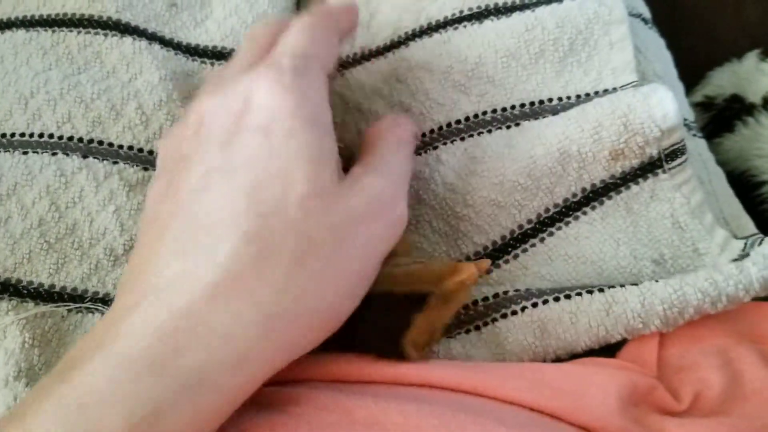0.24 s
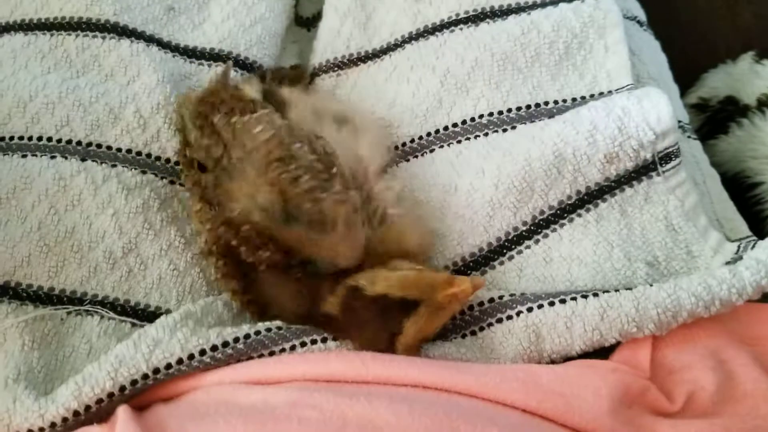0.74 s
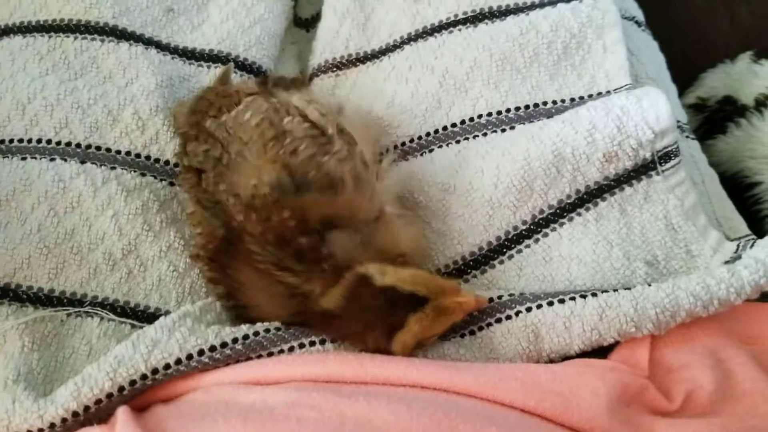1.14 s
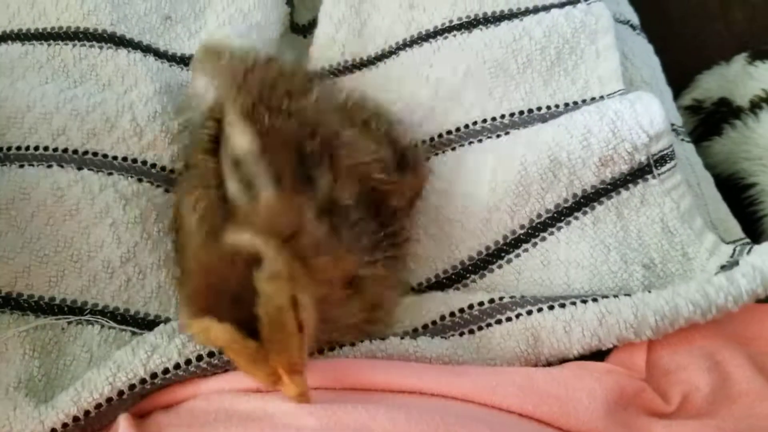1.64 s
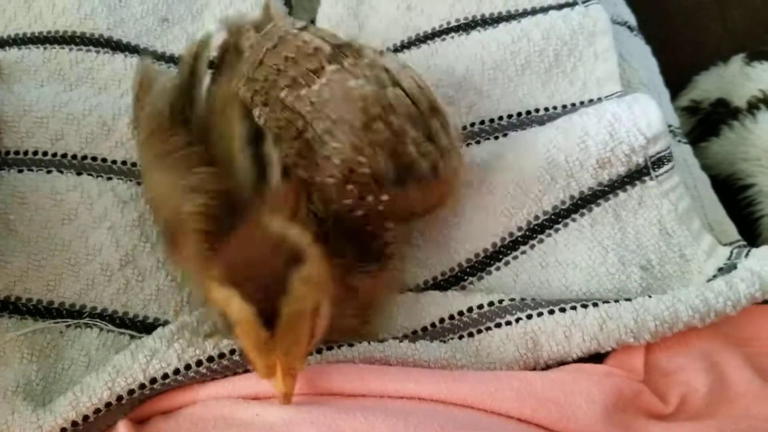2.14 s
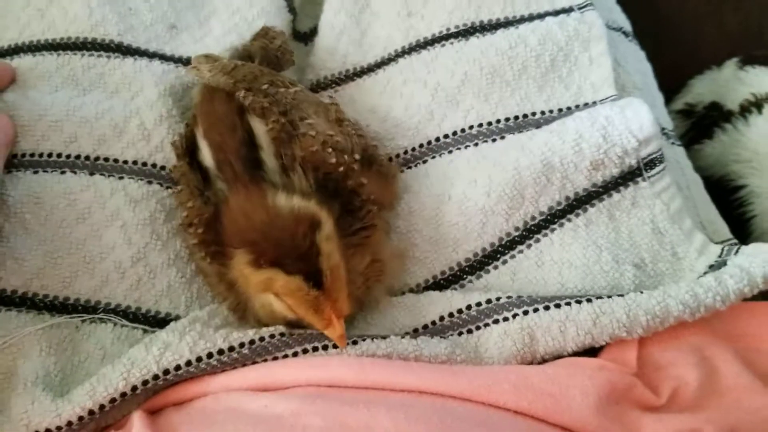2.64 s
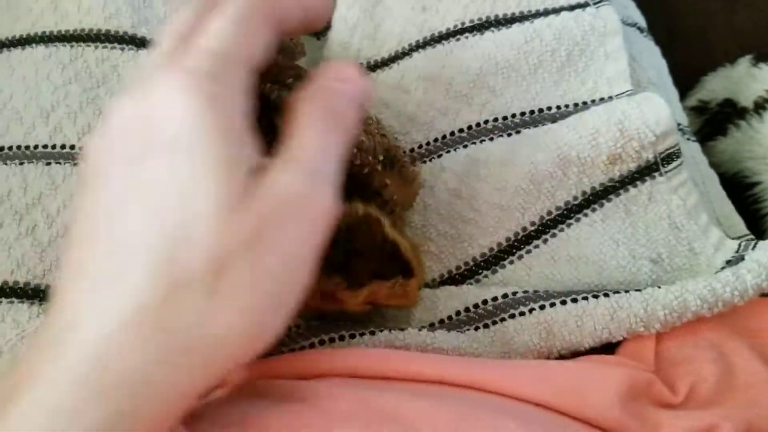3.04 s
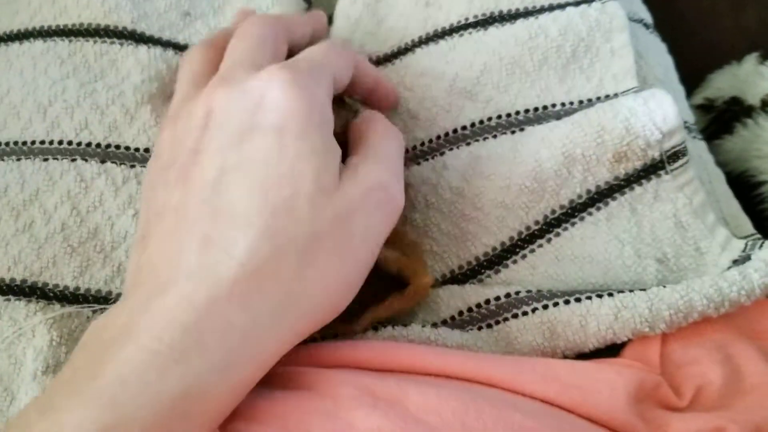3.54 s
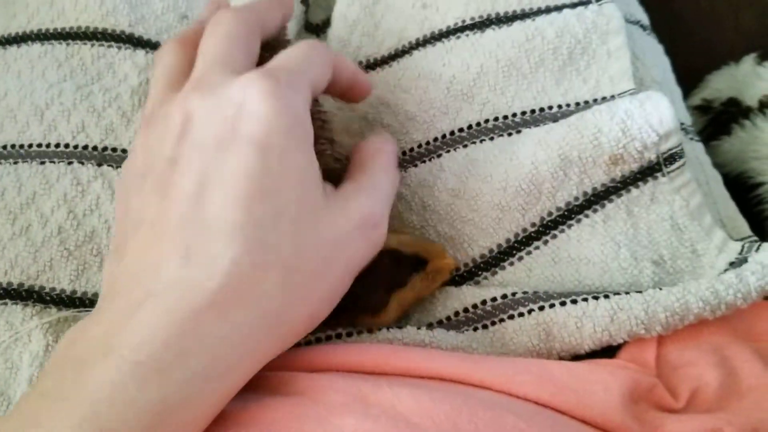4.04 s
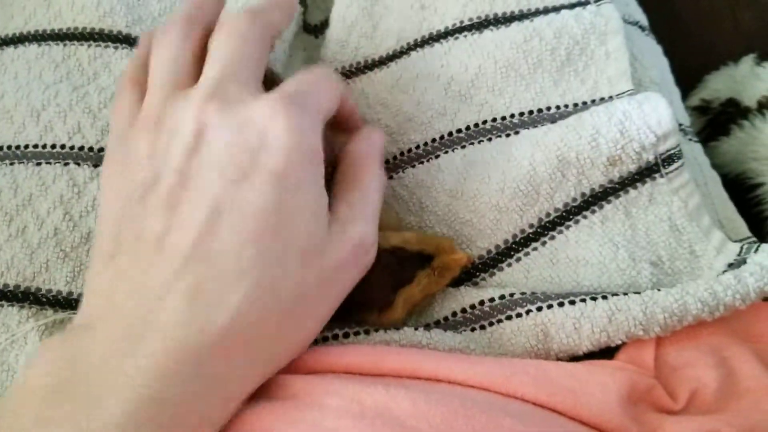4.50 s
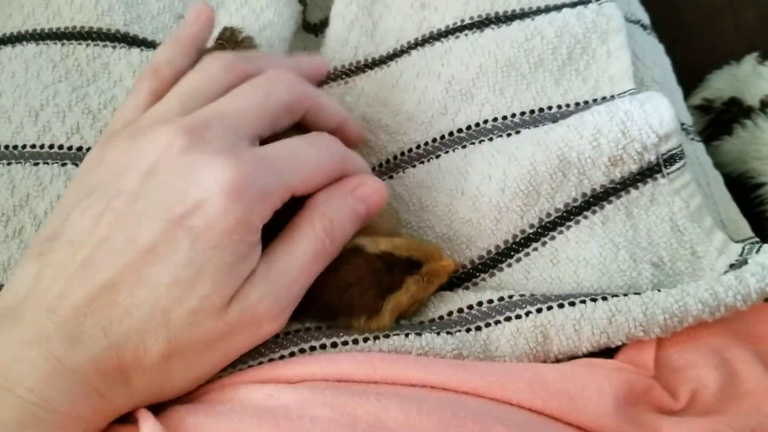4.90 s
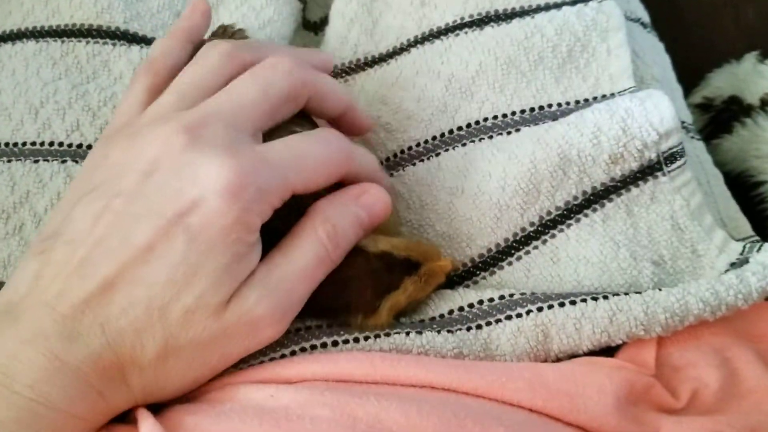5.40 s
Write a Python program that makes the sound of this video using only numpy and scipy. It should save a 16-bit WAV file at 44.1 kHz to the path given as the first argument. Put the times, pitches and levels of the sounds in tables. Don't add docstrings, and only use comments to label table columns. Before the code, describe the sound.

A close, dry stereo pickup in a small furnished room, with a steady low motor hum near 90 Hz, soft rumble and faint hiss throughout. A young chick, toward the right, peeps at once, then twice at 0.4 and 0.6 s: short pure whistles around 2.5 to 3 kHz, over soft palm rustle. A tiny low double thump at 0.53 s marks the hand knocking the holder. From 0.54 to 2.2 s feet scrabble on towel: dull scuffs, sharp thread snaps, and clusters of soft pops, densest at 1.4 to 2.0 s, with feathery rustle. A lull follows. Fingers land at 2.8 s and stroke with fine hiss until the end at about 5.5 s. Louder, slightly lower peeps, some with a cracking waver, come at 2.9, 3.6, 3.8, 4.4, 4.7 and 5.4 s, many sagging then flicking up. Faint distant chicks peep higher, irregularly, blurred by the room.

```python
import sys
import numpy as np
from scipy import signal
from scipy.fft import rfft, irfft, next_fast_len
from scipy.io import wavfile
from scipy.ndimage import uniform_filter1d, map_coordinates

SR = 44100
rng = np.random.default_rng(int(sys.argv[2]) if len(sys.argv) > 2 else 0)


def materialize(psi):
    bounded = np.clip(np.atleast_2d(psi).T, -1, 1)
    quanta = np.round(bounded * 32767).astype(np.int16)
    wavfile.write(sys.argv[1], SR, quanta)


def voltage_ratio(level):
    return 10 ** (np.asarray(level, float) / 20)


N = 249606
TIME = np.arange(N) / SR


def chick():
    # start in seconds, length in seconds, peak level in dB.
    peeps = [
        (.003, 0.052, -38),
        (.409, 0.077, -37),
        (0.576, 0.034, -38),
        (2.881, 0.06, -33.5),
        (3.606, 0.064, -33),
        (3.784, 0.052, -31),
        (4.441, 0.073, -31),
        (4.665, 0.03, -34.5),
        (5.376, 0.068, -33),
    ]
    # start to peak in seconds, slow swell in dB, last push in dB, fade after peak in dB.
    breaths = [(0.03, 7.5, -1.5, 5.5), (0.066, 2, -0.5, 8.5), (0.021, 5, 4, 6), (0.047, 15, 3.5, 1.5),
               (0.048, 9.5, 6.5, 14.5), (0.037, 7, 1.5, 11), (0.051, 5, 3.5, 12.5), (0.014, -2, -2, 6),
               (0.047, 8.5, 5, 12.5)]
    # first note in Hz, note at the turn in Hz, start to flick in seconds, last note in Hz.
    tunes = [(2885, 2545, 0.041, 2560), (2830, 2678, .049, 3070), (2950, 2975, 0.017, 2740),
             (2400, 2345, .029, 2777), (2350, 2327, 0.0353, 2590), (2450, 2304, 0.026, 2508),
             (2370, 2310, 0.036, 2930), (2360, 2417, 0.013, 2345), (2290, 2179, 0.0292, 2790)]
    # left minus right in dB, upper overtones in dB, octave in dB (the hand swallows them).
    postures = [(-16, -12, -22), (-14.5, -5, -18.5), (-14, -10, -38), (-12.5, -8, -25), (-13, -13, -26),
                (-12.5, -13, -27.5), (-13, -17, -21.5), (-12, -15, -22.5), (-11, -13, -23.5)]
    # attack in seconds, last note to end in seconds, slip down at end as share of flick, room in dB.
    manners = [(0.008, 0.0098, 0.43, 2.5), (0.01, 0.0085, 0.43, -0.5), (0.0067, 0.003, 0.1, -7),
               (0.014, 0.0083, 0.44, -5.5), (.011, 0.0112, 0.55, -3), (0.012, 0.011, .4, -3),
               (.011, 0.0109, .5, -4), (0.011, 0.0054, 0.33, -5), (.013, 0.013, 0.78, -1.5)]
    scoops_hz = [61, 79.5, 62.5, 82, 79.5, -1, 221, 80.5, 119.5]
    # multiple of the pitch, level against the octave in dB.
    overtones = [(3, -3), (4, -4), (5, -7)]
    # time in seconds, level in dB, length in seconds.
    hiccups = [
        (2.923, -60.5, 0.0034),
    ]
    # time in seconds, dip in dB, fade in seconds, rebound in dB.
    catches = [
        (2.893, 12, 0.0018, -4),
        (2.906, 20, 0.0028, 0),
        (3.6225, 12, 0.0037, 6),
        (3.639, 15, 0.0036, 4),
        (5.3905, 9.5, 0.0023, 4.5),
        (5.4135, 17, 0.0039, 8),
    ]

    tables = []
    for peep, breath, tune, pose, way, scoop in zip(peeps, breaths, tunes, postures, manners, scoops_hz):
        tables.append(near_peep(*peep, *breath, *tune, pose[2], *way[:3], scoop))
    (hz, db, octave_db), gate = voice(tables, edge_s=.002)
    pan_db, upper_db, _ = per_peep(peeps, postures)
    room_db = per_peep(peeps, manners)[-1]
    phase = 2 * np.pi * np.cumsum(hz) / SR
    tone = voltage_ratio(db) * np.sin(phase) + voltage_ratio(octave_db) * np.sin(2 * phase)
    for k, rel_db in overtones:
        tone += voltage_ratio(octave_db + upper_db + rel_db) * np.sin(k * phase)
    for s, half_db, length in hiccups:
        half_pitch = np.sin(phase / 2) + np.sin(3 * phase / 2)
        tone += voltage_ratio(half_db) * np.exp(-((TIME - s) / length) ** 2) * half_pitch
    tone *= np.sqrt(2) * gate * breaks(catches)
    shimmer = map_coordinates(rng.standard_normal(2000), [TIME * 300])
    tone *= voltage_ratio(.55 * shimmer)
    near = panned(pan_db) * voltage_ratio(1.93) * np.array([np.roll(tone, -2), tone])
    escape = voltage_ratio(6 * (hz - 2500) / 400 + room_db)
    return near + voltage_ratio(-22.0) * voltage_ratio([[-1.5], [1.5]]) * room(escape * tone, delay_s=0.011)


def near_peep(s, length, db, peak, swell_db, push_db, fade_db, first_hz, low_hz, turn, last_hz, octave_db,
              attack, perch, slip, scoop_hz):
    onset_db, end_db, release_s, push_s = -36, -28, .0058, .01
    sag_curve, swell_curve, flick_late = 1.9, 1.3, 1.15
    closed_db, octave_grows = -3.5, .79
    thin_hz, thin_db_per_hz = 2760, .022
    t, end = np.linspace(0, length, num=40), length - release_s
    ramp = lambda a, b: np.clip((t - a) / (b - a), 0, 1)

    flick = np.sin(np.pi / 2 * ramp(turn, length - perch) ** flick_late) ** 2
    flick = flick - slip * ramp(length - perch, length) ** 2 * np.sign(last_hz - low_hz)
    sag = (1 - ramp(0.0057, turn + 0.00092)) ** sag_curve
    hz = low_hz + (first_hz - low_hz) * sag + (last_hz - low_hz) * flick

    under_db = onset_db * (1 - ramp(0, attack)) ** 2
    under_db -= swell_db * (1 - ramp(0, peak)) ** swell_curve
    under_db -= push_db * (1 - ramp(peak - push_s, peak))
    under_db += end_db * ramp(end, length) ** 2
    under_db -= fade_db * ramp(peak, max(end, peak + .001))
    beak_db = closed_db * (1 - ramp(turn - .012, peak)) - thin_db_per_hz * np.maximum(hz - thin_hz, 0)
    octave_swing_db = octave_grows * np.maximum(under_db, -15)
    return np.transpose([s + t, hz + scoop_hz * (1 - ramp(0, attack)), db + under_db,
                         db + octave_db + beak_db + under_db + octave_swing_db])


def scratching():
    out = toe_drag() + thread_snags() + toe_pops()
    return out + voltage_ratio(-13) * room(out.mean(axis=0), delay_s=.003)


def toe_drag():
    # start in seconds, scuff level in dB, length in seconds, brightness in dB.
    kicks = [(0.539, -59.5, 0.05, -0.5), (.592, -54, 0.011, 1.5), (0.73, -61.5, 0.023, -5),
             (0.765, -53, 0.0039, 1), (0.861, -58.5, 0.053, -5), (1.058, -56, 0.016, -19),
             (1.235, -50, 0.035, -9), (1.28, -65, 0.026, 3), (1.374, -51.5, 0.03, -4.5),
             (1.411, -61.5, 0.042, 1.5), (1.452, -58, 0.013, -5), (1.525, -46.5, 0.03, -6),
             (1.601, -56, 0.019, -9), (1.661, -55.5, 0.019, -1.5), (1.677, -49, 0.033, -11.5),
             (1.82, -48, 0.033, -9), (1.865, -60.5, 0.033, 1), (1.975, -48.5, 0.038, -7),
             (2.014, -59, 0.013, -10), (2.1, -67, 0.022, -2), (2.141, -53, 0.039, -4)]
    # frequency in Hz, level in dB per Hz.
    scuff = [(240, -54), (400, 0), (1300, 1.5), (1700, -18.5), (2240, -0.5), (3990, -27), (4730, -26),
             (6000, -19), (7800, -45), (13200, -120)]
    fringe = [(3500, 11.6), (8000, 4.0), (12500, 4.0), (16000, 2.27)]  # Hz, dB per Hz
    dull = sum(voltage_ratio(db) * stroke(s, w) for s, db, w, _ in kicks)
    bright = sum(voltage_ratio(db + b_db) * stroke(s, 1.19 * w) for s, db, w, b_db in kicks)
    out = voltage_ratio(-5) * dull * pair(.95, grain_db=2.5)(colour(scuff)) * voltage_ratio([[-1.3], [1.3]])
    return out + bright * pair(.45, grain_db=4.5)(colour(fringe)) * voltage_ratio([[-2.5], [2.5]])


def stroke(s, length):
    land_s = .005
    return np.clip((TIME - s) / land_s, 0, 1) * np.exp(-((TIME - s) / length) ** 4)


def thread_snags():
    # time in seconds, peak in dB, low part in dB, extra middle in dB.
    snags = [(.5484, -54, -4, -6), (0.5614, -46.5, 8.5, 6), (0.567, -46, -9, 8), (0.5758, -46, 2, 12),
             (.5894, -53, 4, 6), (.594, -47.5, 8.5, -2), (0.602, -48, 6, 9), (.7064, -48, -14, -4),
             (.7316, -36.5, -14, 2.5), (0.7406, -48.5, 5, 4), (0.7483, -51.5, 10, -4),
             (0.871, -43.5, -9, -5), (0.8864, -38.5, -2.5, 3.5), (0.9027, -40, -1, 3), (.907, -48, -2, 0),
             (1.0165, -58, 8, -3), (1.0367, -43.5, -2, 2), (1.057, -52, 1, 0), (1.0848, -51, 3, 0),
             (1.1945, -51, 0, -4), (1.229, -49, -13, -6), (1.2392, -44.5, 6, -3), (1.2432, -50, 0, -3),
             (1.2948, -53, 13, -6), (1.422, -48, -8, 2), (1.4266, -44, 4, 3), (1.5225, -47, 0, 5),
             (1.5333, -55, -5, 4), (1.543, -47, 10, -2), (1.554, -50, 13, 0), (1.5667, -58, -1, 0),
             (1.6634, -49, -8, 0), (1.697, -50, -5, 4), (1.78, -52, -6, -2), (1.8144, -50, 0, 11),
             (1.8804, -51, -1, 4), (1.9895, -50, -1, -3), (1.999, -48, -3, 5), (2.0213, -50, -6, -9),
             (2.1504, -54, 0, 2), (2.1558, -50, -8, 5), (2.1636, -47, -5, 9), (2.2193, -47, -8, -4),
             (2.2244, -45, -15, -8), (2.821, -62, -13, 0), (3.4175, -64, 12, -2)]
    # ring in Hz, decay time in seconds.
    thread = [(12200, 0.00047), (4850, 0.00039), (2050, 0.00029)]
    usual_db, rise_s = -51.5, .000079
    crack_db, crack_hz, crack_s = -3.5, 6600, .00029
    out, t = np.zeros((2, N)), np.arange(300) / SR
    crack = np.cos(2 * np.pi * crack_hz * t) * np.exp(-t / crack_s)
    phases = rng.uniform(0, 2 * np.pi, (len(snags), 3, 2, 1))
    for (s, db, low_db, extra_db), turns in zip(snags, phases):
        mid_db = -3 - .4 * (db - usual_db)
        pan_db = min(0, -19 - .39 * (db - usual_db))
        sizes_db = (db - 1, db + mid_db + extra_db, db + low_db + 3)
        snap = voltage_ratio(db + crack_db) * crack
        for (hz, life), size_db, turn in zip(thread, sizes_db, turns):
            ring = np.sin(2 * np.pi * hz * t + turn * [[.5], [.2]])
            snap = snap + voltage_ratio(size_db) * ring * np.exp(-t / life)
        snap = panned(pan_db)[:, None] * snap * 1.4 * (1 - np.exp(-t / rise_s))
        out[:, round(s * SR):][:, :300] += snap
    return out


def toe_pops():
    # time in seconds, peak in dB, pitch in Hz.
    taps = [(0.885, -49, 1610), (0.903, -48, 1760), (1.0372, -51, 1790), (1.0571, -46.5, 1720),
            (1.2399, -47, 1780), (1.2432, -46, 1400), (1.2495, -43, 1530), (1.2548, -44.0, 1515),
            (1.258, -48.0, 1420), (1.2955, -48.0, 2000), (1.3844, -54, 1370), (1.391, -42.5, 1240),
            (1.3945, -38, 1680), (1.3988, -47.0, 1790), (1.4052, -50.0, 1400), (1.4274, -53, 1580),
            (1.453, -42, 1140), (1.5333, -42, 1630), (1.5378, -35, 1740), (1.5413, -42, 1530),
            (1.546, -47, 1470), (1.549, -49.5, 1200), (1.5538, -40.0, 1390), (1.5584, -49, 1570),
            (1.6063, -45, 1290), (1.6142, -46, 1280), (1.6525, -49, 1440), (1.6677, -43, 1410),
            (1.6725, -46, 1350), (1.6773, -49, 1690), (1.6876, -43.5, 1880), (1.6915, -46, 1320),
            (1.6938, -45.5, 1270), (1.6992, -41, 1510), (1.702, -44, 1180), (1.814, -45, 1390),
            (1.8272, -40, 1290), (1.8333, -45, 1334), (1.8374, -37.5, 1420), (1.8412, -51.0, 1540),
            (1.846, -46.5, 1580), (1.8669, -50.5, 1890), (1.8753, -43, 1360), (1.978, -40, 1280),
            (1.9818, -42, 1450), (1.986, -50, 1270), (1.988, -43.5, 1180), (1.991, -41, 1540),
            (1.9941, -42.5, 1380), (1.9989, -36.5, 1340), (2.0013, -43, 1290), (2.007, -44, 1270),
            (2.026, -48, 1710), (2.1556, -43.0, 1450), (2.1607, -51, 1690), (2.1665, -41, 1410)]
    # time in seconds, peak in dB, pitch in Hz.
    soft_taps = [
        (.8555, -60, 1800),
        (0.9298, -54, 1200),
        (1.353, -52, 1100),
        (1.7965, -51, 1140),
        (1.9615, -50, 1030),
        (2.1025, -51, 1200),
        (2.2955, -62, 1210),
        (3.4175, -52.5, 1000),
    ]
    half_s, level_db = .00056, -2
    rows = list(taps) + list(soft_taps)
    out, t = np.zeros((2, N)), np.arange(300) / SR
    t = t - t.mean()
    for (s, db, hz), turn in zip(rows, rng.uniform(0, 2 * np.pi, len(rows))):
        pop = np.sin(2 * np.pi * hz * t + turn) * np.exp(-(t / half_s) ** 2)
        out[:, round(s * SR) - 150:][:, :300] += voltage_ratio(db + level_db) * voltage_ratio([[-1.1], [1.1]]) * pop
    return out


def rubbing():
    # time in seconds, level in dB.
    struggle = [(0, -75.5), (.34, -90.5), (.6, -75.5), (.85, -87.5), (1.2, -77.5), (1.5, -71), (1.9, -71),
                (2.15, -74.5), (2.3, -85), (2.55, -101)]
    wriggle = voltage_ratio(np.interp(TIME, *np.transpose(struggle)))
    return down(wriggle) + fingertips() + cupped_hand() + palm(wriggle)


def down(wriggle):
    # time in seconds, level in dB, sizzle in dB.
    shakes = [(.49, -75, -16), (0.739, -74, 2), (.895, -89, 7), (1.07, -67.5, 5), (1.23, -72, -8),
              (1.39, -91, 4), (1.68, -76.5, -1), (1.791, -70, -10), (2.019, -89, 1), (2.169, -77, -19),
              (2.227, -67.5, -2)]
    # frequency in Hz, level in dB per Hz.
    rustle_hz_db = [(3000, -9), (4600, -10.5), (6250, -6.5), (8000, -5.5), (8500, -5), (9600, -2.5),
                    (11500, -7.5), (16000, -38)]
    # frequency in Hz, level in dB per Hz.
    sizzle_hz_db = [(5000, -32), (9000, -23), (11000, -9), (12500, 3), (14000, -1.5), (16000, -1)]
    shake_s = .015
    rustle = wriggle + swells([(s, db, shake_s) for s, db, _ in shakes])
    sizzle = voltage_ratio(5) * wriggle + swells([(s, db + rel_db, shake_s) for s, db, rel_db in shakes])
    out = rustle * voltage_ratio(8.0) * pair(.4, grain_db=3.2)(colour(rustle_hz_db)) * voltage_ratio([[-2.5], [2.5]])
    return out + sizzle * voltage_ratio(3.5) * pair(.1, grain_db=2.5)(colour(sizzle_hz_db)) * voltage_ratio([[.3], [-.3]])


def fingertips():
    # middle in seconds, level in dB, half length in seconds.
    strokes = [(2.83, -71, 0.023), (2.9, -80, 0.052), (3.2, -87, 0.085), (3.39, -77, 0.086),
               (3.62, -78.5, 0.088), (3.8, -77, .04), (3.9, -72.5, 0.048), (4, -76.5, .02),
               (4.068, -67.5, 0.037), (4.16, -78, 0.027), (4.23, -70.5, 0.05), (4.38, -72, 0.063),
               (4.6, -68, 0.026), (4.76, -76.5, 0.042), (4.94, -78.5, 0.087), (5.11, -80, 0.052),
               (5.25, -83, 0.041), (5.4, -82, .05), (5.53, -84, 0.044)]
    # frequency in Hz, level in dB per Hz.
    swish = [(3000, -10), (4700, -9), (6250, -6), (7900, -11), (8800, -1.5), (9800, -2.5), (10800, -8.5),
             (11400, -8.5), (13000, -11.5), (16000, -10)]
    land_s, rest_db = 2.815, -86
    level = voltage_ratio(rest_db) * (TIME > land_s) + swells(strokes, power=2.5)
    return level * voltage_ratio(5.0) * pair(.4, grain_db=1.3)(colour(swish)) * voltage_ratio([[-2.4], [2.4]])


def cupped_hand():
    # middle in seconds, level in dB, half length in seconds.
    presses = [
        (.09, -71, .05),
        (4.78, -78, 0.074),
        (4.96, -75.5, 0.15),
    ]
    # frequency in Hz, level in dB per Hz.
    cup = [(3900, -13), (4300, -2), (4550, -2), (4800, -4), (5300, -15)]
    return swells(presses) * pair(.3, grain_db=1.2)(colour(cup))


def palm(wriggle):
    # middle in seconds, level in dB, half length in seconds.
    slides = [
        (.26, -77, 0.15),
        (3.03, -76, 0.14),
        (4.59, -73.5, 0.14),
    ]
    # frequency in Hz, level in dB per Hz.
    palm_hz_db = [(800, -16), (1500, -9), (2500, -2.5), (3500, -5), (5000, -6.5), (6500, -14.5),
                  (9000, -19.5)]
    rest_db, drag_db = -93, -8
    level = voltage_ratio(rest_db) + voltage_ratio(drag_db) * wriggle + swells(slides, power=4)
    return level * voltage_ratio(11.5) * pair(.2, grain_db=1.2)(colour(palm_hz_db))


def knock():
    # time in seconds, peak in dB, pitch in Hz.
    bumps = [
        (0.522, -40, 90),
        (.5285, -41, 110),
        (.534, -36.5, 141),
        (.5385, -36.5, 108),
    ]
    out = np.zeros(N)
    for k, (s, db, hz) in enumerate(bumps):
        t = TIME - s
        out += voltage_ratio(db) * (-1) ** k * np.exp(-(t / 0.0007) ** 2) * np.cos(2 * np.pi * hz * t)
    return out


def other_chicks():
    # start in seconds, length in seconds, middle dB, middle pitch in Hz, end minus start in dB.
    peeps = [(0.517, 0.039, -58, 3120, 0), (1.068, 0.02, -66, 4260, 0), (1.442, 0.043, -56, 3063, 9),
             (1.721, .07, -59.5, 3253, -11), (2.529, 0.045, -61.5, 3140, -6), (2.74, 0.047, -65.5, 3310, 6),
             (3.292, 0.036, -56.5, 3128, 0), (3.504, 0.042, -59.5, 3465, -12),
             (3.775, 0.03, -67.5, 3405, 7), (4.281, 0.045, -57.5, 3254, 3.5),
             (4.528, 0.083, -63.5, 3390, -11), (5.178, 0.015, -74, 3010, -2)]
    # room share in dB, push in dB.
    manners = [(-1, -1), (-1, 0), (-14, 4), (-4, -3), (-5.5, -2), (1, 0), (-7, 7), (-0.5, 8), (-15, -3),
               (-4.5, 5), (-1, -3), (-5, -5)]
    scoops = [.97, 1.01, .98, .89, .86, .93, .98, .85, 1.01, .94, .81, .99]
    flicks = [0.89, 2.6, 1.04, 1.02, 0.87, 1.03, 1.1, 0.86, .9, 1.09, 1.04, 1.03]
    # time in seconds, dip in dB, fade in seconds, rebound in dB.
    catches = [
        (1.762, 9.4, 0.0047, 0),
        (3.527, 56, 0.0086, 1.3),
        (4.551, 6.3, 0.0027, 0),
    ]
    tables = []
    for peep, scoop, manner, flick in zip(peeps, scoops, manners, flicks):
        tables.append(far_peep(*peep, scoop, manner[1], flick))
    (hz, db), gate = voice(tables, edge_s=0.0019)
    tone = np.sqrt(2) * gate * breaks(catches) * voltage_ratio(db) * np.sin(2 * np.pi * np.cumsum(hz) / SR)
    share = voltage_ratio(per_peep(peeps, manners)[0])
    return voltage_ratio(-2.0) * voltage_ratio([[-1.1], [1.1]]) * tone + room(share * tone, delay_s=0.012)


def far_peep(s, length, db, hz, lean_db, scoop, push_db, flick):
    shared_tune = [(.22, 1.022), (.62, 1), (.82, 1.02)]
    edge_s, onset_db, end_db = .009, -9, -12
    push_at, push_wide = .67, .13
    share, ratio = np.transpose([(0.0033, scoop)] + list(shared_tune) + [(0.89, flick)])
    u = np.linspace(0, 1, num=30)
    edge_db = onset_db * np.clip(1 - u * length / edge_s, 0, 1)
    edge_db += end_db * np.clip(1 - (1 - u) * length / edge_s, 0, 1)
    effort_db = lean_db * (u - .5) + push_db * np.exp(-((u - push_at) / push_wide) ** 2)
    return np.transpose([s + u * length, hz * np.interp(u, share, ratio), db + edge_db + effort_db])


def appliance():
    motor_hz, motor_db, wander_rad = 89.6, -64.5, .68
    drift = wander_rad * map_coordinates(rng.standard_normal(40), [TIME * 5])
    phase = 2 * np.pi * motor_hz * TIME + np.array([[.14], [-.14]]) + drift
    return np.sqrt(2) * voltage_ratio(motor_db) * np.sin(phase)


def rumble():
    # frequency in Hz, level in dB per Hz.
    spectrum = [(12, -42), (20, -27), (38, -10), (81, -8.5), (208, -0.5), (256, -5), (327, -5), (357, -7),
                (425, -9.5), (456, -7.5), (800, -23), (1000, -32), (1300, -41), (1690, -55), (2860, -120)]
    # centre in Hz, width in Hz, lift in dB.
    peaks = [(54.8, 8.2, 9.5), (90, 7.6, 11), (154, 9.2, 4.5), (188, 25, 2), (329.3, 10.3, 10),
             (417.4, 7.3, 13)]
    # frequency in Hz, left-right likeness.
    alike = [(25, .88), (80, .96), (250, .93), (400, .97), (600, .9), (1200, .6)]
    # frequency in Hz, left minus right in dB.
    side_db = [(60, -0.5), (200, 0.5), (350, 3.5), (700, -1.5)]
    # frequency in Hz, left lead in radians.
    lead_rad = [(90, 0), (300, .52), (600, .56), (900, .8)]

    def mid_side(hz):
        lift = voltage_ratio(sum(db / (1 + (2 * (hz - c) / w) ** 2) for c, w, db in peaks))
        turn = np.arccos(np.clip(along(alike, hz), -1, 1)) / 2
        return colour(spectrum)(hz) * lift * [np.cos(turn), np.sin(turn)]

    def ports(hz):
        lean = voltage_ratio(along(side_db, hz) * [[.5], [-.5]])
        return lean * np.exp(.5j * along(lead_rad, hz) * np.array([[1], [-1]]))

    mid, side = filtered(rng.standard_normal((2, N)), mid_side)
    return voltage_ratio(-53.42) * unit(filtered(np.array([mid + side, mid - side]), ports))


def port_hiss():
    # frequency in Hz, level in dB per Hz.
    hiss = [(530, -26), (900, -6.5), (1460, -1.5), (1570, -0.5), (1850, -4.5), (2250, -12), (2450, -30),
            (2930, -17), (3150, -35), (4570, -13.5), (4980, -19.5), (14900, -8.5), (16000, -4.5)]
    return voltage_ratio(-70.5) * pair(0.)(colour(hiss))


def room(x, delay_s):
    # frequency in Hz, t60 in seconds.
    t60 = [(500, 0.88), (3000, 0.23), (10000, 0.006)]
    flicker_rate, flicker_db = 150, 2.2
    out, step = np.zeros((2, N + SR)), SR // 3
    for i in range(0, N, step):
        hz, t, z = signal.stft(rng.standard_normal((2, step)), SR, nperseg=256)
        decay = voltage_ratio(-60 * t / along(t60, hz)[:, None])
        tail = signal.istft(z * decay, SR, nperseg=256)[1][:, :step]
        wet = signal.fftconvolve(x[None, i:i + step], tail / np.linalg.norm(tail[0]), axes=1)
        out[:, i + int(delay_s * SR):][:, :wet.shape[1]] += wet
    knots = rng.standard_normal((2, 1400))
    flicker = np.array([map_coordinates(k, [TIME * flicker_rate]) for k in knots])
    return out[:, :N] * voltage_ratio(flicker_db * flicker - .6)


def voice(tables, edge_s):
    s, *cols = np.concatenate(tables).T
    gate = sum((TIME >= rows[0][0]) & (TIME < rows[-1][0]) for rows in tables) > 0
    soft = lambda v: uniform_filter1d(v, size=max(1, int(edge_s * SR)))
    return [soft(np.interp(TIME, s, c)) for c in cols], soft(soft(gate * 1.))


def per_peep(rows, values):
    which = np.searchsorted([row[0] for row in rows], TIME + .02) - 1
    return np.array(values)[np.clip(which, 0, None)].T


def breaks(rows):
    snap_back_s, rebound_s = .0016, .0043
    db = np.zeros(N)
    for s, dip_db, fade, rebound_db in rows:
        t = TIME - s
        db -= dip_db * np.exp(-(t / np.where(t < 0, fade, snap_back_s)) ** 2)
        db += rebound_db * (t > 0) * np.exp(-(t / rebound_s) ** 2)
    return voltage_ratio(uniform_filter1d(db, size=44))


def swells(rows, power=2):
    return sum(voltage_ratio(db) * np.exp(-np.abs((TIME - s) / w) ** power) for s, db, w in rows)


def pair(alike, grain_db=0.):
    a, b, c = rng.standard_normal((3, N))
    turn = np.arccos(np.clip(alike, -1, 1)) / 2
    clumps = voltage_ratio(grain_db * unit(uniform_filter1d(c, size=30)))
    mid, side = clumps * np.cos(turn) * a, clumps * np.sin(turn) * b
    return lambda gain: unit(filtered(np.array([mid + side, mid - side]), gain))


def panned(db):
    left = 2 / (1 + voltage_ratio(-db))
    return np.array([left, 2 - left])


def filtered(x, response):
    m = next_fast_len(N + SR // 2)
    return irfft(rfft(x, m) * response(np.fft.rfftfreq(m, 1 / SR)), m)[..., :N]


def colour(points):
    return lambda hz: voltage_ratio(along(points, hz)) * (hz > .7 * points[0][0]) * (hz < 1.3 * points[-1][0])


def along(points, hz):
    f, v = np.transpose(points)
    return np.interp(np.log(hz + 1), np.log(f + 1), v)


def unit(x):
    return x / np.sqrt(np.mean(x ** 2) + 1e-20)


def scene():
    left, right = scratching() + rubbing()
    towel = np.array([np.roll(left, -3), right])
    return chick() + towel + knock() + other_chicks() + appliance() + rumble()


def roll_off(x):
    return signal.sosfilt(signal.butter(12, 16320, fs=SR, output="sos"), x)


def record(dry):
    top_hz = 15830
    mix = filtered(dry + port_hiss(), lambda hz: hz < top_hz)
    return roll_off(mix)


dry = scene()
out = record(dry)
materialize(out)
```